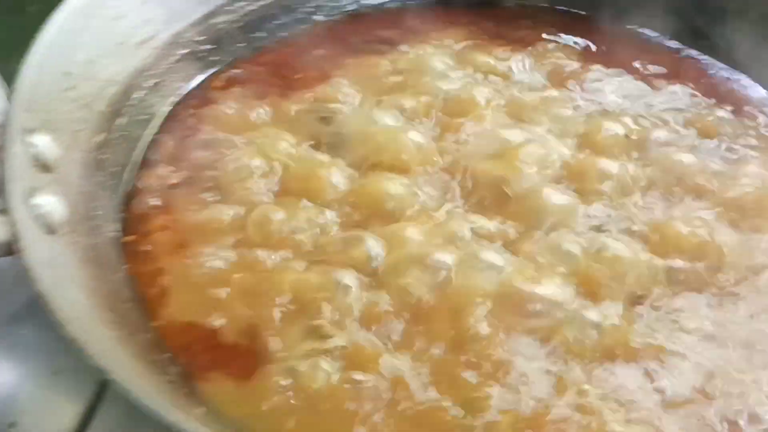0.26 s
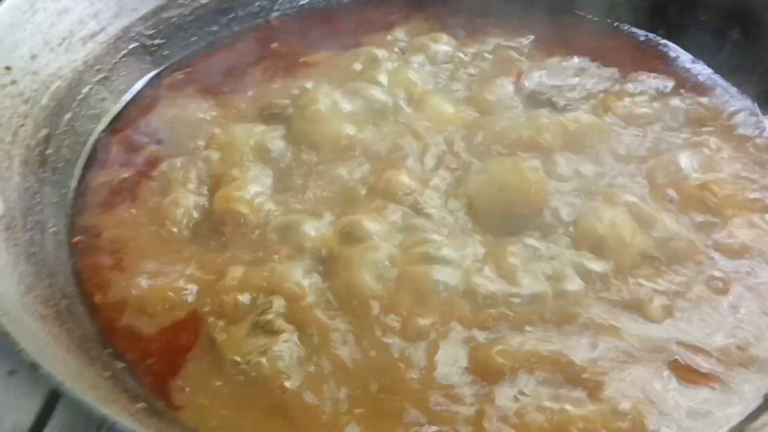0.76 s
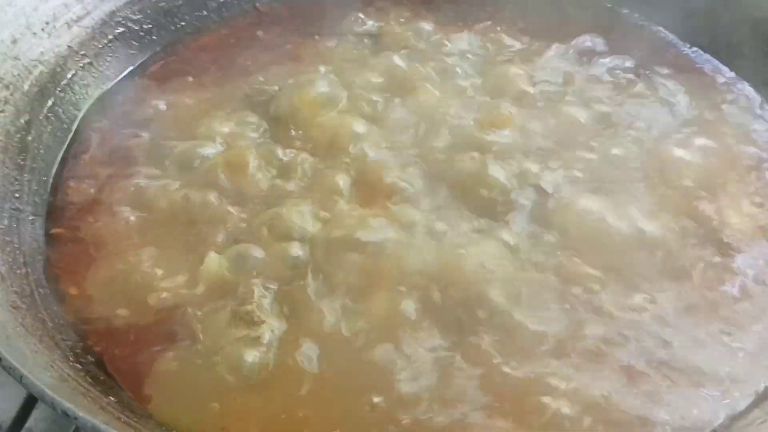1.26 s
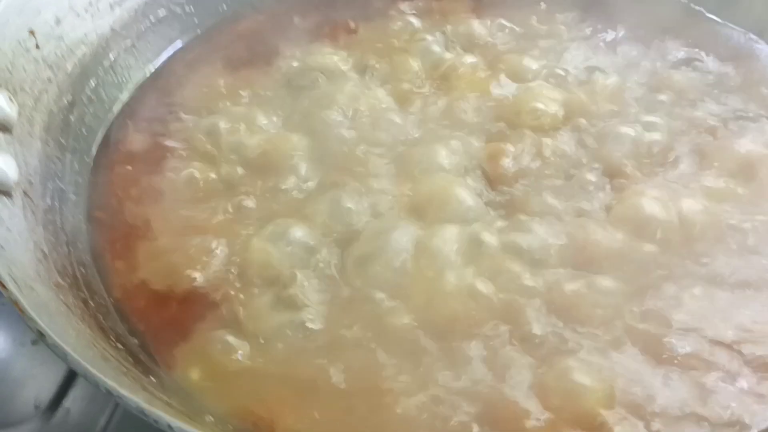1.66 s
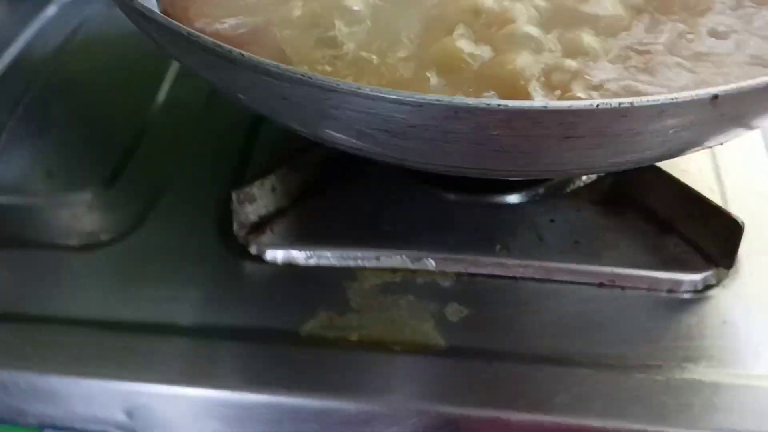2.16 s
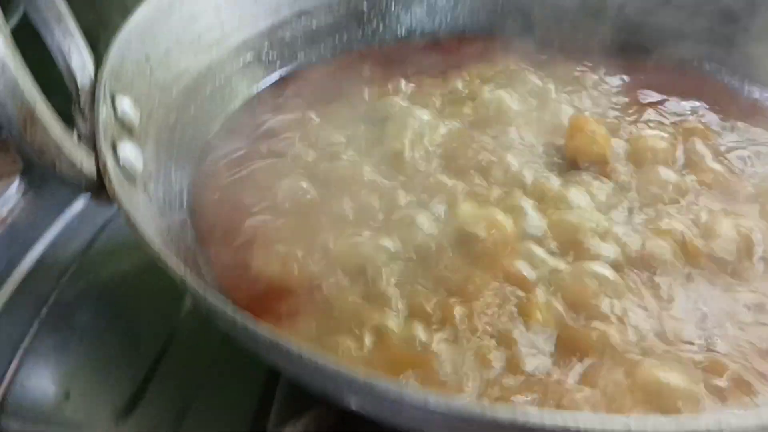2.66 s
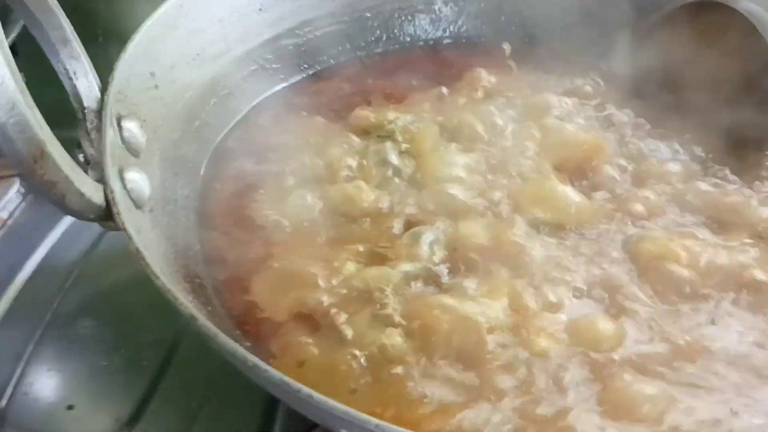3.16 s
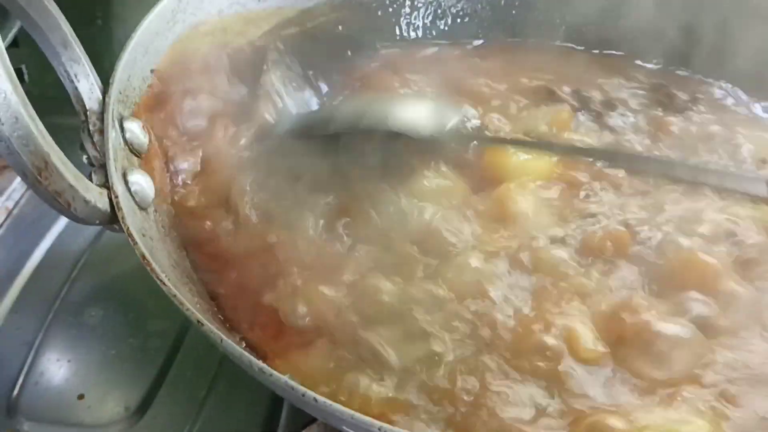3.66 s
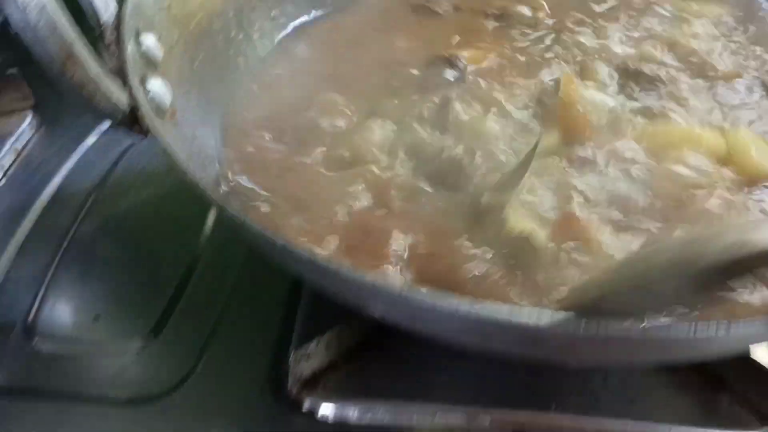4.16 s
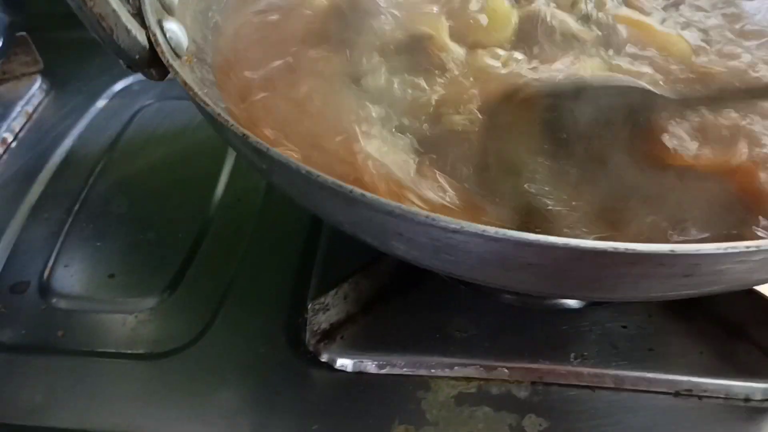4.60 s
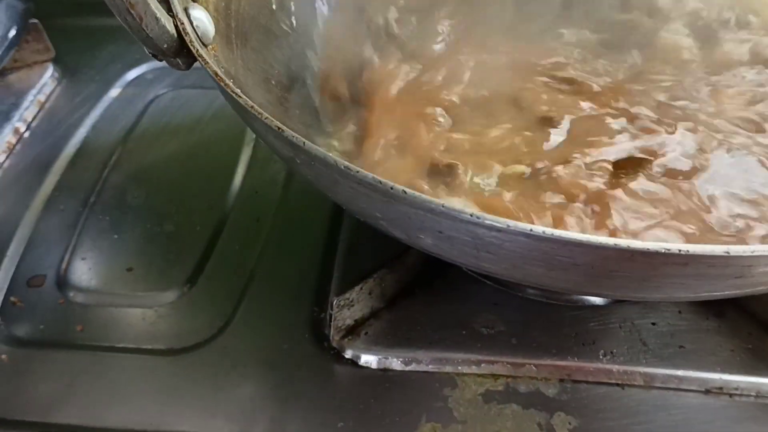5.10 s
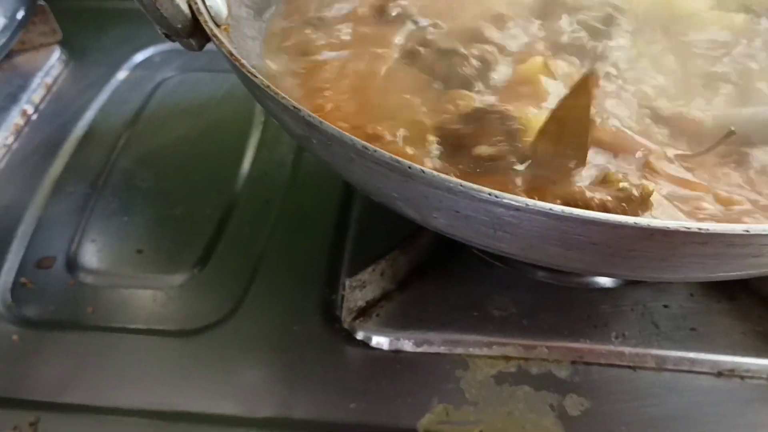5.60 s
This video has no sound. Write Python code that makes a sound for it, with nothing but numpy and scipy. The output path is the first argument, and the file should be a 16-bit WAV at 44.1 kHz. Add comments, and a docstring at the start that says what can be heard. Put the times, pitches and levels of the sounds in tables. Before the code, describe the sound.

In a small kitchen, a hand-held microphone sits close to a pan of bubbling, lightly crackling curry. Much louder steel sounds cut in: a double clank with a drag and a thin slide, a loud ring, then two more sharp clanks. A ladle scrapes and stirs, fat spits, and the bubbling eases, with a faint hum swelling now and then underneath.

```python
"""A thick curry boils in a steel pan in a small kitchen, heard by a hand-held pair of microphones.
Bubbles burst close by and fat crackles from the start; a low hum soon swells, and returns now and then.
After a second, steel utensils a little way off clank, drag and slide; the loudest ring comes just after
two seconds. From three and a half seconds the sauce fizzes, a ladle rubs and stirs, fat spits and the
boil calms. All along, the left microphone favours the middle range and hears everything a moment late."""
import sys
import numpy as np
from scipy import signal
from scipy.fft import rfft, irfft
from scipy.io import wavfile
from scipy.ndimage import uniform_filter1d

SR = 44100
rng = np.random.default_rng(int(sys.argv[2]) if len(sys.argv) > 2 else 0)


def inscribe(sig):
    """Save sig as 16-bit PCM at rate SR to the path in sys.argv[1].

    A 1-D sig is mono; a 2-D sig holds one channel per row.
    Samples are clipped to [-1, 1] before scaling.
    """
    pcm = np.round(np.clip(np.atleast_2d(sig).T, -1, 1) * 32767)
    wavfile.write(sys.argv[1], SR, pcm.astype(np.int16))


N = 257588

# The tone colour of the boil. Each row: frequency in Hz, relative level in dB.
BOIL_COLOUR = [(25, -23), (53, -18), (120, -7.5), (240, -5), (600, -7.5), (800, -7.5), (1400, -9),
               (1800, -13.5), (2200, -19), (4200, -22.5), (6500, -26), (8000, -33.5), (11000, -34.5),
               (13500, -48), (14800, -32), (15700, -42.5), (15900, -83)]
# How loud the boil is. Each row: time in seconds, level in dB.
BOIL_LEVEL = [(0, -56.5), (.9, -57), (1.7, -56), (2.2, -58), (2.7, -61), (3.1, -58), (3.7, -58.5),
              (4.0, -62.5), (4.9, -61), (5.4, -65), (5.84, -65)]
# How long steel rings, before each blow stretches it. Each row: frequency in Hz, seconds to fall 60 dB.
RING_TIME = [(500, 0.21), (1500, 0.31), (4000, 0.34), (8000, 0.24), (16000, 0.17)]
# The tone colours named in the table of blows. Each row: frequency in Hz, relative level in dB.
LID = [(180, -52), (300, -28), (1090, -7), (1210, -30), (1360, 8), (2000, -13), (2240, 2.5), (2740, -56),
       (2930, -17), (3650, -11.5), (6240, -26), (16500, -69)]
TRAY = [(1470, -56), (2300, -18), (2550, -37), (2900, -17), (3680, -10), (6350, -8.5), (13100, -30.5),
        (15200, -28), (16100, -32), (16500, -66)]
POT = [(150, -41), (250, -24.5), (495, -21.5), (590, -12), (800, -5), (1030, -3.5), (1580, -10.5),
       (1750, -17.5), (2480, -10), (3010, -18), (5280, -16), (10600, -26.5), (11400, -42), (15400, -27.5),
       (16500, -47)]
RIM = [(150, -22), (250, 2), (343, -4), (394, -38), (531, -1), (853, -12.5), (1170, -17.5), (1390, -7),
       (4060, -1.5), (10800, -12.5), (12500, -31), (15700, -14), (16500, -41)]
LADLE = [(150, -39), (250, -0.5), (303, 6.5), (795, -14.5), (868, -52), (999, -11), (1230, -9.5), (1810, 0),
         (5370, -3.5), (5870, 2.5), (11800, -7.5), (15400, -12.5), (16500, -40)]
# The resonances named in the table of blows. Each row: pitch in Hz, width in Hz, strength in dB.
LID_RINGS = [(1351, 29, 2), (1884, 25, 9), (2207, 25, 13), (3050, 40, 11), (3558, 30, 13), (3900, 40, 13)]
POT_RINGS = [(608, 24, 14), (874, 22, 7), (958, 9, 13), (1075, 9, 13), (1114, 9, 14), (1536, 26, 13),
             (1636, 18, 9), (2040, 30, 7), (2463, 16, 9), (2600, 22, 5), (2710, 30, 10), (3305, 30, 10),
             (4382, 40, 7), (5281, 22, 13), (5990, 30, 12), (6880, 26, 15), (8125, 30, 20), (9383, 30, 17),
             (10660, 30, 18)]
RIM_RINGS = [(544, 21, 12), (730, 28, 18.5), (1140, 49, 25), (2288, 41, 10), (4020, 35, 9.2),
             (4060, 55, 4.8), (7360, 56, 6.4), (8400, 40, 7.1)]
LADLE_RINGS = [(300, 24, 10), (1012, 30, 16), (1421, 30, 9), (1852, 30, 7), (2300, 30, 8), (2713, 22, 13),
               (4134, 40, 11), (5841, 26, 12), (6858, 26, 15), (7978, 30, 16), (9227, 30, 16)]


def amp(db):
    """Turns decibels into a gain."""
    return 10 ** (np.asarray(db, float) / 20)


def evened(x):
    """Scales a signal to an average (rms) size of 1."""
    return x / np.sqrt(np.mean(x ** 2) + 1e-20)


def wander(shape, *spans):
    """A slow random drift: noise smoothed once for each span."""
    x = rng.standard_normal(shape)
    for span in spans:
        x = uniform_filter1d(x, span)
    return evened(x)


def read(points, hz):
    """Looks up a table by frequency, joining its rows on a log scale."""
    f, value = np.transpose(points)
    return np.interp(np.log(hz + 1), np.log(f + 1), value)


def curve(points):
    """Turns a tone colour table into a gain for any frequency."""
    return lambda hz: amp(read(points, hz))


def peaks(table):
    """Turns resonances, the pitches an object favours, into a gain for any frequency."""
    return lambda hz: np.sqrt(sum(amp(db) ** 2 / (1 + (2 * (hz - f) / w) ** 2) ** 2
                                  for f, w, db in table))


def add(mix, start, sound):
    """Mixes a sound in at a start time in seconds."""
    part = mix[:, round(start * SR):][:, :sound.shape[1]]
    part += sound[:, :part.shape[1]]


def mics(hz, tilt):
    """Left and right gains; tilt scales how much the two microphones differ."""
    # Each row: frequency in Hz, left level over right in dB.
    left_boost = [(100, 1.5), (400, 3.5), (800, 8.5), (1800, 11.5), (2600, 4.5), (6000, 2), (12000, -1.5)]
    db = tilt * read(left_boost, np.atleast_1d(hz)) / 2
    return amp([db, -db])


def shaped(x, gain, tilt):
    """Colours a stereo sound by gain(Hz) and the microphones, then sets it to a standard level."""
    hz = np.fft.rfftfreq(x.shape[1], 1 / SR)
    y = irfft(rfft(x) * gain(hz) * mics(hz, tilt), x.shape[1])
    return y / np.sqrt(np.mean(y ** 2) / 2 + 1e-20)


def arch(t, start, rise, hold, fall, db, foot_db):
    """A gain that climbs from foot_db below its top, holds and sinks back."""
    edges = start + np.cumsum([0, max(rise, .002), max(hold, .002), max(fall, .002)])
    return amp(db - np.interp(t, edges, [foot_db, 0, 0, foot_db]))


def build_up(t, hz, bass_s=0.043, bass_hz=500):
    """Low notes take longer to build."""
    return 1 - np.exp(-(t + 1e-4) * (1 + (hz / bass_hz) ** 2) / bass_s)


def streaked(x, depth_db, t60=None):
    """Narrow resonances come and go by chance; with t60(Hz), each band also builds and dies away."""
    hz, t, spectra = signal.stft(x, SR, nperseg=512, noverlap=384)
    streaks = evened(amp(depth_db * wander(spectra.shape, 14, 14)))
    envelope = 1 if t60 is None else amp(-60 * t / t60(hz)[:, None]) * build_up(t, hz[:, None])
    return signal.istft(spectra * streaks * envelope, nperseg=512, noverlap=384)[1][:, :x.shape[1]]


def room(x, t60, share):
    """Echoes blur into a tail of noise that falls 60 dB in t60 seconds."""
    t = np.arange(SR // 3) / SR
    tail = rng.standard_normal((2, len(t))) * amp(-60 * t / t60) * (t > .004)
    echoes = signal.fftconvolve(x, tail / np.linalg.norm(tail[0]), axes=1)[:, :N]
    return x + share * echoes


def simmer():
    """The boil is a flickering noise; its middle range swells most, the hiss above is steadier."""
    # Each row: frequency in Hz, how alike left and right are from 0 to 1.
    likeness = [(50, 0.39), (300, 0.72), (600, 0.79), (1200, 0.063), (2400, 0.066), (4000, 0.03),
                (9000, 0.026)]
    frames, hz = N // 128 + 5, np.fft.rfftfreq(512, 1 / SR)[:, None]
    a, b, c, d, patches = rng.standard_normal((frames, 257, 5)).T
    same, left = read(likeness, hz), a + 1j * b
    spectra = np.array([left, same * left + np.sqrt(1 - same ** 2) * (c + 1j * d)])
    patches = evened(uniform_filter1d(uniform_filter1d(patches, 4, axis=0), 14, axis=1))
    flicker_db = read([(1500, 3.28), (5000, 2.9)], hz) * patches + wander(frames, 4)
    level_db = np.interp(np.arange(frames) * 128 / SR, *np.transpose(BOIL_LEVEL))
    swell_share = read([(150, 0.17), (700, 1.0), (2000, 0.56), (4000, 0.27)], hz)
    spectra *= amp(flicker_db + swell_share * (level_db - level_db.mean()))
    noise = signal.istft(spectra, nperseg=512, noverlap=384)[1][:, :N]
    return amp(level_db.mean()) * shaped(noise, curve(BOIL_COLOUR), tilt=1.0)


def blip(hz, swell_s, glide=0.043):
    """A tone swells unevenly and dies; glide lifts its pitch, as when a bubble opens."""
    age = np.arange(2400) / SR / max(swell_s, .0003)
    turns = hz * swell_s * (age + glide * age ** 2 / 2)
    uneven = 1 + 0.4 * np.sin(2 * np.pi * (0.48 * age + rng.random()))
    return np.sin(2 * np.pi * turns) * (age * np.exp(1 - age)) ** 2 * uneven


def boil_ticks(per_second, spread_db, follow):
    """Random ticks of uneven size; follow sets how much they weaken as stirring calms the boil."""
    change_db = np.interp(np.arange(N) / SR, *np.transpose(BOIL_LEVEL)) - BOIL_LEVEL[0][1]
    ticks = rng.random(N) < per_second / SR
    return ticks * amp(follow * change_db + spread_db * np.minimum(rng.exponential(1, N), 3))


def bubbles():
    """Big bubbles ring and splash as they burst, among many small ones that come by chance."""
    # Each row: start in seconds, level in dB, pitch in Hz, swell time in seconds, splash level in dB.
    bursts = [(0.004, -37.5, 1230, 0.0014, -49), (0.012, -36.5, 1570, 0.001, -61),
              (0.124, -50, 1130, 0.0067, -40), (0.144, -44, 775, 0.0048, -44),
              (0.154, -44.5, 780, 0.0048, -47), (0.208, -46.5, 1920, 0.0023, -41.5),
              (0.231, -30, 825, 0.0028, -61), (0.2415, -37, 920, 0.0019, -62),
              (0.254, -54, 1020, 0.0054, -64), (0.309, -48, 598, 0.0062, -70),
              (0.411, -44, 1370, 0.002, -58), (0.454, -41.5, 1240, 0.0026, -53),
              (0.473, -40.5, 1180, 0.0038, -56), (0.558, -49, 1640, 0.0027, -58),
              (0.609, -55, 1800, 0.0013, -50), (0.676, -49.5, 1200, 0.0041, -49.5),
              (0.969, -43.5, 1200, 0.0021, -36), (0.991, -43, 1160, 0.0036, -66),
              (1.068, -51, 1020, 0.009, -58), (1.803, -34.5, 1447, 0.0023, -45),
              (1.817, -35.5, 1225, 0.0016, -64), (2.055, -49, 1380, 0.0014, -51),
              (2.865, -42, 1190, 0.0011, -66), (2.887, -43, 1406, 0.0044, -51),
              (3.067, -48, 1330, 0.0015, -52.5), (3.156, -46, 753, 0.0053, -70),
              (3.179, -49.5, 750, 0.011, -73), (3.219, -50, 1280, 0.002, -53),
              (3.498, -50, 695, 0.0074, -78), (3.585, -48.5, 1550, 0.0037, -74),
              (3.6, -44, 748, 0.0086, -53), (3.905, -50, 710, 0.0014, -46.5),
              (4.105, -54, 710, 0.0045, -57), (4.635, -41, 744, 0.01, -69), (5.03, -65, 1880, 0.0057, -55),
              (5.085, -60, 1685, 0.01, -54), (5.227, -53, 760, 0.0018, -46.5),
              (5.342, -61, 2206, 0.0066, -62)]
    out, t = np.zeros((2, N)), np.arange(2400) / SR
    splash_gain = peaks([(2140, 1400, 0), (1390, 1400, 0)])
    for start, db, hz, swell_s, splash_db in bursts:
        splash = shaped(rng.standard_normal((2, len(t))), lambda f: splash_gain(f) ** 2, tilt=1.0)
        splash *= amp(splash_db) * np.exp(-t / .004) * np.minimum(t / .002, 1)
        add(out, start, amp(db) * blip(hz, swell_s) * mics(hz, tilt=1.65) + splash)
    for hz in np.geomspace(500, 2400, num=24):
        ticks = boil_ticks(per_second=4.5, spread_db=1.6, follow=2.9)
        out += amp(-72.5) * signal.oaconvolve(ticks, blip(hz, 1.8 / hz))[:N] * mics(hz, tilt=0.46)
    return room(out, t60=0.21, share=0.61)


def crackle():
    """Hot fat gives off fine, bright ticks."""
    ticks = boil_ticks(per_second=250, spread_db=2.6, follow=1.45) * rng.standard_normal((2, N))
    treble = lambda f: curve(BOIL_COLOUR)(f) * f ** 2 / (f ** 2 + 4000 ** 2)
    return amp(-83) * shaped(ticks, treble, tilt=0.75)


def hum(hz=51, bed_db=-89.5):
    """A low tone that swells and fades."""
    # Each row: start, rise, hold and fall in seconds, level in dB.
    swells = [(.85, 0.38, .04, .12, -70), (2.28, 0.11, 0.092, 0.11, -78), (2.948, 0.15, .02, 0.14, -74),
              (3.242, 0.1, 0.15, 0.33, -62.5), (3.976, 0.15, 0.21, .2, -63), (4.68, 0.19, 0.084, 0.28, -66)]
    t = np.arange(N) / SR
    level = amp(bed_db) + sum(arch(t, *row, 25) * (t > row[0]) * (t < sum(row[:4])) for row in swells)
    return np.sqrt(2) * uniform_filter1d(level, size=900) * np.sin(2 * np.pi * hz * t)


def blips(rows, glide, tilt):
    """One short tone for each row of a table."""
    out = np.zeros((2, N))
    for start, db, hz, swell_s in rows:
        add(out, start, amp(db) * blip(hz, swell_s, glide) * mics(hz, tilt))
    return out


def knocks():
    """Bouncing steel makes hard little contacts."""
    # Each row: start in seconds, level in dB, pitch in Hz, swell time in seconds.
    contacts = [(1.154, -34, 1510, 0.0023), (1.233, -30, 1500, 0.0015), (3.2456, -15.5, 3870, 0.001),
                (3.2576, -21.5, 3960, 0.00071), (3.2627, -17, 2140, 0.00032), (4.2714, -21, 4400, 0.00067),
                (4.413, -37.5, 2010, 0.0023)]
    return blips(contacts, glide=0, tilt=1.0)


def clear_tones(t, colour, resonances, stretch):
    """Each resonance of the steel rings as a close pair of dying tones; narrow ones last longer."""
    grid_hz = np.linspace(0, SR / 2, num=2000)
    colour_power = np.sum(curve(colour)(grid_hz) ** 2) * grid_hz[1]
    out = np.zeros((2, len(t)))
    for hz, width, db in resonances:
        twin_hz = hz + width * (rng.random() - .5)
        phases = rng.random((2, 2, 1))  # different at each microphone
        pair = np.sin(2 * np.pi * (hz * t + phases[0]))
        pair += 0.45 * np.sin(2 * np.pi * (twin_hz * t + phases[1]))
        pair *= amp(2.7 * wander(len(t), 600, 600))  # each tone wavers slightly
        t60 = 0.78 * stretch * read(RING_TIME, hz) * np.sqrt(24 / width)
        level = amp(read(colour, hz) + db - 60 * t / t60) * np.sqrt(width / colour_power)
        out += level * pair * build_up(t, hz) * mics(hz, tilt=0.43)
    return out


def clanks():
    """Each blow on steel is a short crack, then a dense, fuzzy ring blurred by the room."""
    # Each row: start in seconds, ring and crack levels in dB, crack decay in seconds, first tick over
    # the crack in dB, left over right at 8 kHz in dB, ring time factor, tone colour, resonances.
    blows = [(1.166, -33, -25, 0.01, -11, -5, 5.5, LID, LID_RINGS),
             (1.25, -30, -31.5, 0.016, 0, -11.5, 1.47, TRAY, LID_RINGS),
             (2.2511, -18.5, -18.5, 0.0084, -35, -14.5, 2.07, POT, POT_RINGS),
             (3.2443, -31.5, -23.5, 0.0053, -1, -7, 1.33, RIM, RIM_RINGS),
             (4.27, -31, -24, 0.012, -5.5, -9.5, 2.1, LADLE, LADLE_RINGS)]
    t, out = np.arange(SR * 6 // 10) / SR, np.zeros((2, N))
    for start, ring_db, crack_db, decay_s, tick_db, left_db, stretch, colour, resonances in blows:
        a, b, c, d = rng.standard_normal((len(t), 4)).T
        tone, resonant = curve(colour), peaks(resonances)
        wash_gain = lambda f: tone(f) * np.hypot(1, amp(-4) * resonant(f))
        t60 = lambda f: stretch * read(RING_TIME, f) * np.hypot(1, resonant(f)) ** 0.21
        wash = shaped(np.array([a, 0.02 * a + 0.95 * b]), wash_gain, tilt=0.82)
        ring = streaked(wash, 7.02, t60) + clear_tones(t, colour, resonances, stretch)
        ring *= (1 - np.exp(-t / 0.017)) * amp(-90 * t ** 2)  # the ring dies ever faster and stops short
        shade = lambda f: amp(np.outer([.5, -.5], left_db * f / 8000))  # the hand shades the left treble
        crack_gain = lambda f: tone(f) * (f / 4000) ** 0.064 * shade(f) * (f / np.hypot(f, 800)) ** 3
        crack = shaped(np.array([c, d]), crack_gain, tilt=0.71)
        crack *= (1 - np.exp(-t / 0.0024)) * np.exp(-t / decay_s) + amp(tick_db) * np.exp(-t / 0.0012)
        add(out, start, amp(ring_db) * ring + amp(crack_db) * crack)
    return out


def friction(start, end, lump_db, same):
    """Sticking and slipping makes lumpy noise; returns the times, the noise and its soft-ended fade."""
    t = np.arange(start, end, 1 / SR)
    left, other, lumps = rng.standard_normal((len(t), 3)).T
    lumps = amp(lump_db * evened(uniform_filter1d(uniform_filter1d(lumps, 200), 200)))
    right = same * left + np.sqrt(1 - same ** 2) * other
    fade = signal.windows.tukey(len(t), .06)
    return t, np.array([left, right]) * lumps * fade, fade


def stroke(levels, resonances, colour, rasp_db, rasp_db_per_s, lump_db, tilt):
    """Scraping sets off a vessel's low resonances and a brighter, gritty rasp."""
    start, end = levels[0][0], levels[-1][0]
    t, drive, fade = friction(start, end + .04, lump_db, same=0.05)
    level_db = np.interp(t, *np.transpose(levels))
    level_db -= 300 * np.maximum(t - end + 0.014, 0)  # the utensil lifts off
    # Below 560 Hz both microphones hear much the same, the left 20 samples later.
    shared = np.array([np.roll(drive[0], 20), drive[0]])
    bass = signal.sosfiltfilt(signal.butter(4, 560, fs=SR, output="sos"), shared - drive)
    body = amp(level_db) * shaped(drive + 0.7 * bass, peaks(resonances), tilt)
    rasp = streaked(shaped(drive, curve(colour), tilt=0.51), depth_db=2.55)
    rasp *= amp(uniform_filter1d(level_db, size=1500) + rasp_db + rasp_db_per_s * (t - start))
    out = np.zeros((2, N))
    add(out, start, fade * (body + rasp))
    return out


def drag():
    """A utensil drags over steel, starting loud and dying away."""
    # Each row: time in seconds, level in dB.
    levels = [(1.232, -14), (1.249, -40.5), (1.252, -23.5), (1.3, -27.5), (1.312, -22), (1.395, -27.5),
              (1.405, -29), (1.47, -31.5), (1.48, -36), (1.58, -44.5), (1.64, -71)]
    # Each row: pitch in Hz, width in Hz, strength in dB.
    resonances = [(181, 20, -19), (337, 51, -11.5), (427, 63, -8.5), (610, 24, -6.5), (697, 114, -3.5),
                  (1007, 210, -11), (1043, 24, 5), (1061, 26, -1.5), (1220, 260, -20), (1404, 27, 1),
                  (1470, 270, -9.5), (1930, 370, -18), (2160, 55, -5.5), (2222, 40, -7), (3650, 40, -18.5),
                  (3620, 33, -27)]
    # Each row: frequency in Hz, relative level in dB.
    rasp = [(1470, -35), (2300, -22), (2530, -27), (2800, -2.5), (3020, 0.5), (3250, -2), (3730, 2),
            (4200, 0.5), (6180, -3), (7480, -31), (9860, -24), (12000, -53), (15600, -92)]
    return stroke(levels, resonances, rasp, rasp_db=-13, rasp_db_per_s=-36.5, lump_db=0.95, tilt=0.67)


def noise_swells(rows, gain, lump_db, tilt, streak_db, sag=0):
    """Lumpy noise rises and fades; sag makes its pitch start higher and end lower."""
    out = np.zeros((2, N))
    for row in rows:
        t, drive, fade = friction(row[0], sum(row[:4]), lump_db, same=0.037)
        high = shaped(drive, lambda f: gain(f / (1 + sag)), tilt)
        low = shaped(drive, lambda f: gain(f * (1 + sag)), tilt)
        progress = np.linspace(0, 1, len(t))
        sound = streaked((1 - progress) * high + progress * low, streak_db)
        add(out, t[0], arch(t, *row, foot_db=22) * fade * sound)
    return out


def slides():
    """Steel slides on steel with a thin hiss that sinks a little in pitch."""
    # Each row: start, rise, hold and fall in seconds, level in dB.
    moves = [(1.46, 0.038, 0.32, 0.13, -62.5), (1.74, 0.093, 0.13, 0.068, -53.5),
             (5.38, .2, 0.2, 0.17, -54)]
    # Each row: pitch in Hz, width in Hz, strength in dB.
    resonances = [(3645, 460, 9), (3170, 720, 2), (3900, 190, 2), (2750, 300, -13)]
    return noise_swells(moves, peaks(resonances), lump_db=1.5, tilt=.6, streak_db=3, sag=0.023)


def fizz():
    """The sauce fizzes faintly as it is stirred up."""
    # Each row: start, rise, hold and fall in seconds, level in dB.
    swells = [(3.53, 0.055, .13, 0.091, -61.5), (5.24, 0.032, 0.25, 0.12, -71.5)]
    # Each row: frequency in Hz, relative level in dB.
    colour = [(1760, -34), (3000, -21), (3710, -6), (6340, 0), (7960, -19), (9320, -12), (13600, -36),
              (14100, -19), (15500, -19)]
    return noise_swells(swells, curve(colour), lump_db=2.6, tilt=.4, streak_db=6)


def rubs():
    """The ladle rubs the bottom of the full pan, which drones low."""
    # Each row: start, rise, hold and fall in seconds, level in dB.
    moves = [(3.64, 0.1547, 0.059, 0.1224, -47), (4.42, 0.066, 0.33, 0.0634, -54)]
    # Each row: pitch in Hz, width in Hz, strength in dB.
    resonances = [(654, 38, 5.5), (697, 69, 2.5), (779, 17, 3), (302, 40, -3.5)]
    return noise_swells(moves, peaks(resonances), lump_db=2.5, tilt=1.8, streak_db=3)


def spits():
    """Hot fat spits in tiny, very high pops."""
    # Each row: start in seconds, level in dB, pitch in Hz, swell time in seconds.
    pops = [(3.6975, -40, 6300, 0.00079), (3.905, -46, 7180, 0.0011), (5.0435, -62, 10000, 0.00076),
            (5.3138, -63, 6300, 0.0021), (5.738, -57, 5800, 0.00094)]
    return blips(pops, glide=0.0013, tilt=5.4)


def stir():
    """A stirring utensil scrapes the vessel, growing grittier as it goes."""
    # Each row: time in seconds, level in dB.
    levels = [(4.402, -63), (4.41, -53), (4.462, -40.5), (4.466, -35.5), (4.502, -40), (4.548, -34),
              (4.556, -30.5), (4.582, -45), (4.596, -34.5), (4.82, -65)]
    # Each row: pitch in Hz, width in Hz, strength in dB.
    resonances = [(900, 530, -11), (1058, 54, 6.5), (1212, 156, 6), (1394, 94, 1), (1630, 320, -6),
                  (1880, 87, 1.5), (2043, 10, 6), (2280, 42, -16), (3180, 70, -22)]
    # Each row: frequency in Hz, relative level in dB.
    rasp = [(1350, -54), (2300, -1.5), (2610, -9.5), (3090, 4), (3440, -4.5), (3880, 1.5), (4290, -7.5),
            (5280, -2), (7540, -25), (8950, -27), (9500, -33), (12400, -44), (20900, -120)]
    return stroke(levels, resonances, rasp, rasp_db=-18.5, rasp_db_per_s=60.8, lump_db=0.29, tilt=0.77)


def scene():
    """All sources together."""
    curry = simmer() + bubbles() + crackle() + spits()
    utensils = clanks() + knocks() + drag() + stir() + rubs() + slides()
    return curry + utensils + fizz() + hum()


def record(dry, lag_samples=40, top_hz=17100):
    """Delays the left channel a moment and cuts off the highest treble."""
    left = np.concatenate([np.zeros(lag_samples), dry[0, :-lag_samples]])
    low_pass = signal.firwin(511, top_hz, window=("kaiser", 9), fs=SR)
    return signal.oaconvolve(np.array([left, dry[1]]), low_pass[None], "same")


dry = scene()
out = record(dry)
inscribe(out)
```